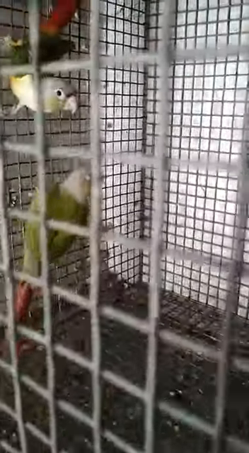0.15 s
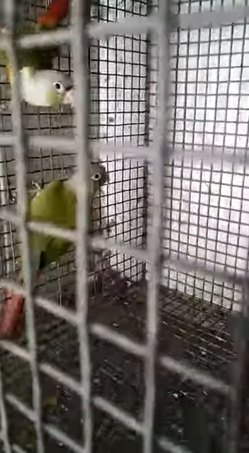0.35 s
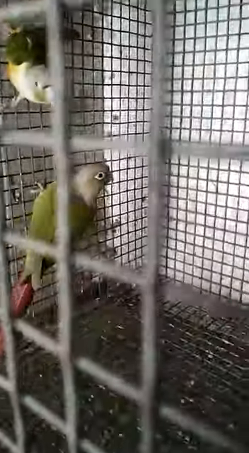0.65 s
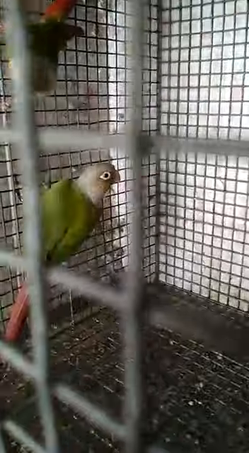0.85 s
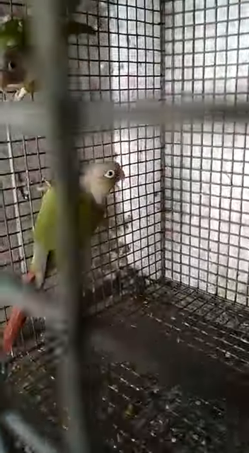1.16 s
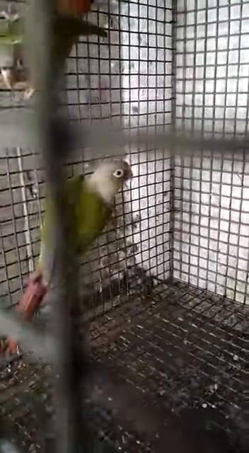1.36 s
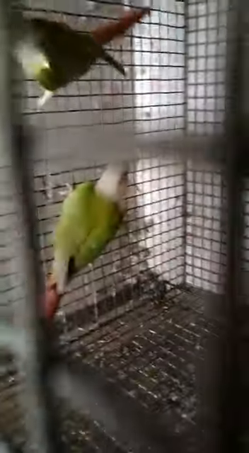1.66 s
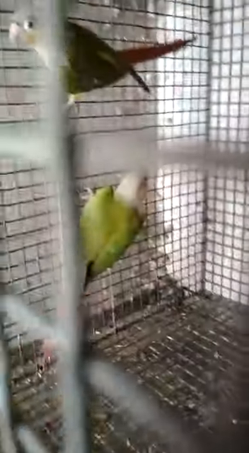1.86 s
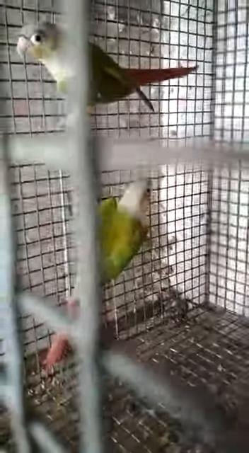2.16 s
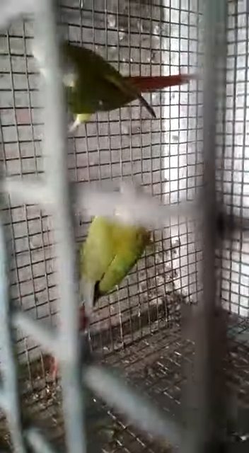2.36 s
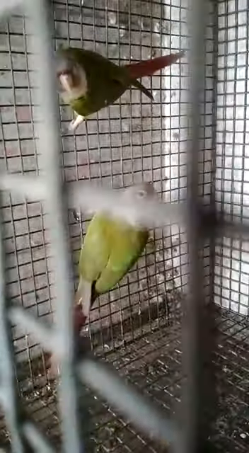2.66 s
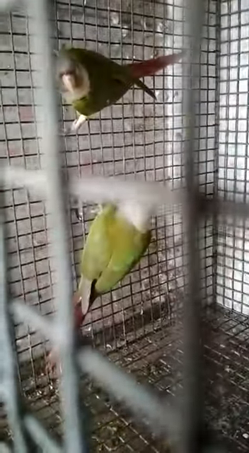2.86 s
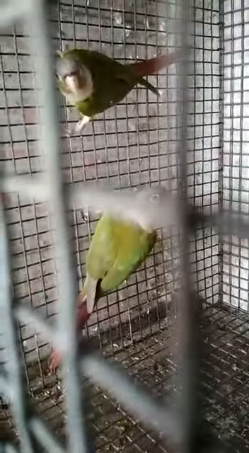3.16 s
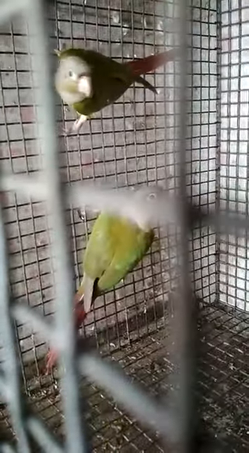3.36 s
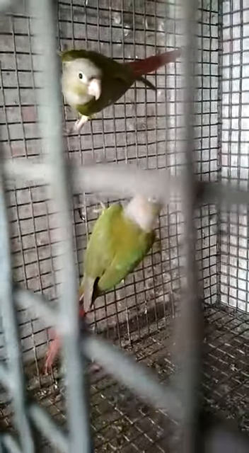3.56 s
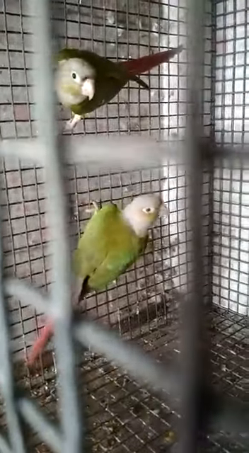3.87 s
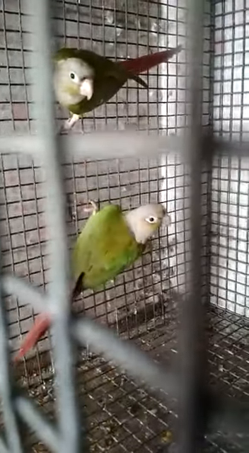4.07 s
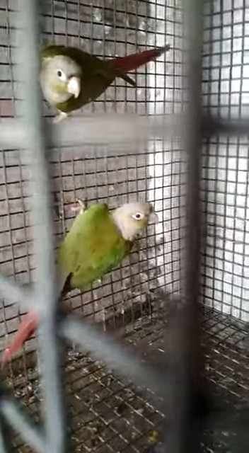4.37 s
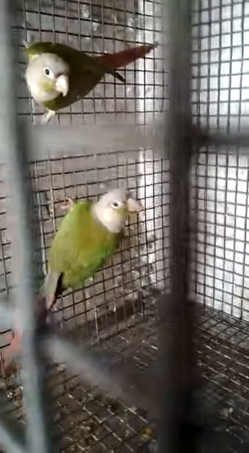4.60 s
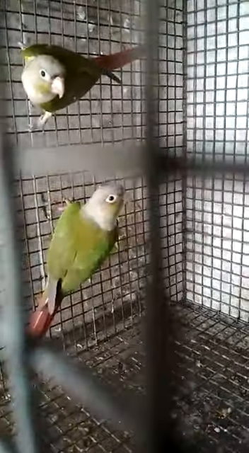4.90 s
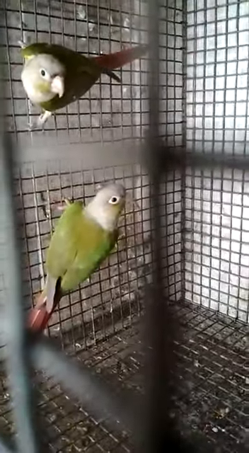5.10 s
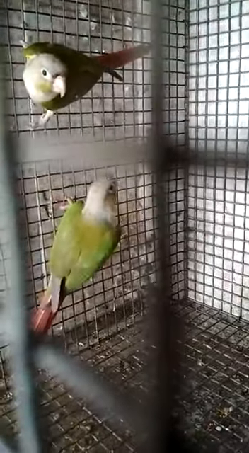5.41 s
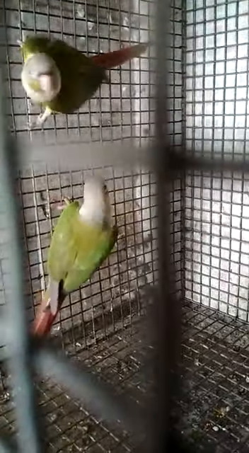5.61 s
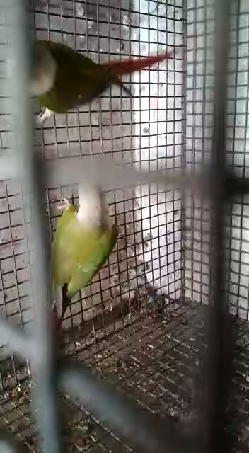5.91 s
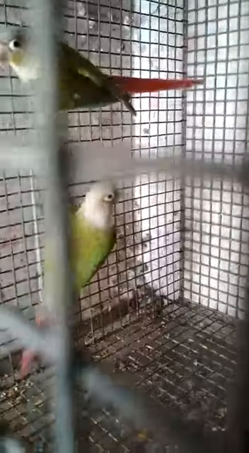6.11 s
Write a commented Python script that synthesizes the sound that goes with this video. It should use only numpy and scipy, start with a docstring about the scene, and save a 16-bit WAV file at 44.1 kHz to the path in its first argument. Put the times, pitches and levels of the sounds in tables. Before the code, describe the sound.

Loud, raspy, high-pitched parrot squawks close by give way to faint bird calls across a room, then a harsh bark and one more squawk.

```python
"""A small parrot squawks about four times a second in a wire cage, close to a phone, in a hard-walled
room; each squawk climbs by short notes to a rasping arch. Its nearer mate cuts in; the loudest notes
overload the microphone and make the gain control duck, with a low thump near 2 s. Other birds answer
from afar, and a hand shifts on the phone. Near the end come one lower bark and a last squawk.
A motor hums throughout."""
import sys
import numpy as np
from scipy import signal
from scipy.fft import rfft, irfft, next_fast_len
from scipy.io import wavfile
from scipy.ndimage import uniform_filter1d, map_coordinates

SR = 44100
rng = np.random.default_rng(int(sys.argv[2]) if len(sys.argv) > 2 else 0)


def dump(signal):
    """Clip the signal to [-1, 1] and save it as 16-bit WAV at the path in sys.argv[1]."""
    limited = np.clip(np.atleast_2d(signal).T, -1, 1)
    pcm = np.round(limited * 32767).astype(np.int16)
    wavfile.write(sys.argv[1], SR, pcm)


N = 275625
TOP_HZ = 15650

# Squawks of the leading parrot and its mate: (time [s], first note [s], second note [s], arch [s],
# second note's pitch [Hz], mid-arch pitch [Hz], relative level [dB])
LEADER_SQUAWKS = [ (-.055, 0.022, 0.014, 0.045, 2520, 2962, -5), (.2, .019, 0.022, 0.045, 2537, 3027, -5.5),
                  (.454, 0.0082, 0.022, 0.054, 2537, 3018, -6),
                  (.713, 0.0012, 0.018, 0.061, 2482, 2995, -5), (.99, .014, 0.015, .056, 2770, 2922, -6),
                  (1.253, 0.0021, .016, .056, 2510, 3024, -5.5),
                  (1.516, 0.012, 0.015, 0.054, 2580, 2938, -4),
                  (6.148, .013, 0.022, .046, 2502, 3018, -5.5)]
MATE_SQUAWKS = [ (.862, .016, 0.017, 0.04, 2594, 3057, 2.3), (1.081, .016, .015, 0.039, 2686, 3032, 2.3),
                (1.652, .015, 0.014, .033, 2740, 2884, 2), (2.031, 0.01, 0.018, .041, 2438, 3014, 5.2)]
# The three notes of a squawk: (relative level [dB], roughness [1])
LEADER_NOTES = [(-5.5, 0.73), (2, 0.53), (2, 0.53)]
MATE_NOTES = [(-6.5, 0.53), (-5, 0.52), (1, 0.38)]
# Resonances of throat and open beak: (frequency [Hz], gain [dB])
LEADER_THROAT = [(900, -16), (1700, -12.5), (2300, -4.5), (3000, -5), (3600, 3.5), (4600, 6), (5900, 1.5),
                 (6700, 0.5), (7600, -0.5), (8800, -6.5), (11300, 2.5), (12200, -4.5), (13200, -13),
                 (16000, -16)]
MATE_THROAT = [(900, -12), (1700, -7.5), (2300, -5.5), (3000, -8.5), (3600, 9), (4600, 6), (5900, 0.5),
               (6700, 4.5), (7600, 0.5), (8800, -5.5), (11300, 2.5), (12200, -0.5), (13200, -12),
               (16000, -10)]
def parrot(squawks, manner, throat):
    """Frequency modulation: the voice climbs through up to two short notes, then arches and falls."""
    climb, arch = (.96, 1.015), (.94, .82)
    gap_s = .00498  # the voice breaks between notes
    notes = []
    for s, first_s, second_s, arch_s, second_hz, arch_hz, db in squawks:
        steps = [(first_s, .875 * second_hz, climb), (second_s, second_hz, climb),
                 (arch_s, arch_hz, arch)]
        for (length, hz, bend), (note_db, rough) in zip(steps, manner):
            if length > gap_s:
                notes.append(note(s, length - gap_s, hz, db + note_db, bend, rough))
            s += length
    return syrinx(notes, throat, jitter=.065, flutter_rate=1500, rasp=6, hiss=1.65, doubling=.5,
                  edge=.002)


# The bark's catch, body and sagging end: (time [s], length [s], start pitch [Hz], middle pitch [Hz],
# end pitch [Hz], relative level [dB], roughness [1])
BARK_NOTES = [(5.723, 0.0046, 2070, 2090, 2120, -19, 0.9), (5.733, .066, 2250, 2307, 2193, -6, .62),
              (5.801, .019, 2135, 2110, 1990, -9.5, 0.3)]
# Its throat resonances: (frequency [Hz], gain [dB])
BARK_THROAT = [(900, -21.5), (1600, -19), (2200, -7), (3100, -3), (4300, -4.5), (5300, -2.5), (6200, -3),
               (7600, -10.5), (10000, -4), (12000, -17.5), (13200, -22), (16000, -15)]
def bark():
    """Aperiodic vibration: strong pitch jitter makes this lower call harsh."""
    return syrinx(BARK_NOTES, BARK_THROAT, jitter=.11, flutter_rate=1400, rasp=6, hiss=1.1,
                  doubling=.15, edge=.0027)


def note(s, length, hz, db, bend, rough):
    """A pitch glide through hz; bend holds the start and end pitch as ratios to it."""
    return s, length, hz * bend[0], hz, hz * bend[1], db, rough


def syrinx(notes, throat, jitter, flutter_rate, rasp, hiss, doubling, edge):
    """Source and filter: membranes flutter in pitch (jitter) and level (rasp); the throat resonates."""
    track = np.zeros(N)
    for s, length, start_hz, middle_hz, end_hz, db, rough in notes:
        size = int((length + edge) * SR)
        u = np.linspace(0, 1, size)
        arch = np.polyval(np.polyfit([0, .5, 1], [start_hz, middle_hz, end_hz], 2), u)
        pitch = arch * (1 + jitter * rough * wobble(flutter_rate, size))
        phase = 2 * np.pi * np.cumsum(pitch) / SR
        orders = np.arange(1, int(TOP_HZ / middle_hz) + 1)
        offsets = rng.uniform(0, 2 * np.pi, (16, 1))[:len(orders)]
        tone = unit(np.sin(orders[:, None] * phase + offsets).sum(0))
        tone *= 1 + doubling * rough * np.sin(phase / 2)  # period doubling: lines between harmonics
        breath = hiss * rough ** 2 * rng.standard_normal(SR // 2)[:size]
        source = (tone + breath) * amp(rasp * rough * wobble(flutter_rate / 2, size))
        gate = np.clip(np.minimum(u, 1 - u) * (length + edge) / edge, 0, 1)  # fades of edge seconds
        add(track, s, amp(db) * unit(shaped(source * gate, throat)))
    return track


# Balance between the microphone ports: (frequency [Hz], left minus right level [dB])
PORT_BALANCE = [(60, -3), (110, 12), (200, 10), (380, -2), (700, 7), (1290, 6.5), (2380, 4.5), (5600, 3),
                (8120, -2.5), (11000, -10), (15000, 0)]
def near_parrots():
    """Direct-to-reverberant ratio: of the birds close by, the nearer mate is drier than the leader."""
    leader = parrot(LEADER_SQUAWKS, LEADER_NOTES, LEADER_THROAT)
    mate = parrot(MATE_SQUAWKS, MATE_NOTES, MATE_THROAT)
    low_call = bark()
    heard = (room(leader, wet_db=0, walls_db=13.5, delays_s=(.0004, .007))
             + room(mate, wet_db=-6, walls_db=10, delays_s=(.0004, .009))
             + room(low_call, wet_db=-11, walls_db=19, delays_s=(.0004, .007)))
    return filtered(heard, lambda hz: amp(np.outer([.5, -.5], along(PORT_BALANCE, hz))))


# The flock's squawks and nasal chatter: (time [s], length [s], pitch [Hz], relative level [dB])
FLOCK_SQUAWKS = [ (1.821, .11, 2916, -31), (1.978, 0.046, 2690, -29), (2.203, 0.0497, 2984, -25),
                 (2.42, .10, 2770, -31.5), (2.535, 0.059, 3190, -35), (2.695, 0.025, 2800, -36),
                 (3.136, 0.055, 2820, -35), (3.32, 0.2, 2910, -33.5), (3.681, .13, 2943, -33),
                 (4.69, 0.09, 2860, -37), (4.789, .088, 2820, -37.5), (4.945, 0.063, 2876, -35),
                 (5.09, 0.084, 2990, -34.5), (5.347, 0.082, 2940, -33.5)]
FLOCK_CHATTER = [ (2.309, 0.089, 1140, -30), (2.891, 0.076, 1419, -33), (3.60, 0.087, 1131, -33),
                 (4.005, 0.024, 3520, -42.5), (4.179, 0.077, 1577, -36.5), (4.25, 0.098, 1127, -38.5),
                 (4.331, 0.076, 1087, -35.5), (4.441, 0.156, 1048, -41), (4.60, 0.053, 1138, -34.5),
                 (5.19, 0.067, 1065, -34), (5.24, 0.078, 1163, -35)]
# A deeper parrot rasps, then honks: (time [s], length [s], start pitch [Hz], middle pitch [Hz],
# end pitch [Hz], relative level [dB], roughness [1])
DEEP_NOTES = [(3.06, 0.15, 1433, 1563, 1617, -32.5, 1.1), (3.15, 0.21, 1765, 2024, 1913, -30.5, 0.99),
              (3.31, 0.1, 1635, 1669, 1740, -27.5, 0.36)]
# Their throat resonances: (frequency [Hz], gain [dB])
FLOCK_THROAT = [(1200, -35), (2200, 0.5), (3100, 5), (3800, 0.5), (4600, 10.5), (5900, 2), (7200, 3),
                (9000, -3.5), (11300, 7), (13200, -13), (16000, -53)]
CHATTER_THROAT = [(1200, -17), (2200, -13.5), (3200, 3), (3800, -6), (4600, 3.5), (5700, -8.5), (6900, -5),
                  (8000, -18), (9300, -6.5), (11300, -3), (13200, -15), (16000, -36.5)]
DEEP_THROAT = [(900, -14), (1600, -0.5), (2400, 0.5), (3300, -0.5), (5000, -0.5), (7000, -10), (11000, -5),
               (15000, -31)]
def far_parrots():
    """Diffuse field: birds across the room arrive mostly by way of the walls."""
    squawks = [note(*call, bend=(.99, .94), rough=.7) for call in FLOCK_SQUAWKS]
    chats = [note(*call, bend=(.95, .99), rough=.64) for call in FLOCK_CHATTER]
    flock = syrinx(squawks, FLOCK_THROAT, jitter=.07, flutter_rate=600, rasp=5, hiss=2.2,
                   doubling=.7, edge=.02)
    chatter = syrinx(chats, CHATTER_THROAT, jitter=.065, flutter_rate=250, rasp=6, hiss=1.6,
                     doubling=.2, edge=.02)
    deep = syrinx(DEEP_NOTES, DEEP_THROAT, jitter=.07, flutter_rate=500, rasp=5, hiss=2.2,
                  doubling=.4, edge=.02)
    return room(flock + chatter + deep, wet_db=3.5, walls_db=-4, delays_s=(.0011, .018))


# Reverberation time: (frequency [Hz], time to fall 60 dB [s])
ROOM_T60 = [(300, 0.073), (2600, 0.38), (5500, 0.34), (11000, 0.27), (16000, 0.15)]
def room(voice, wet_db, walls_db, delays_s):
    """Convolution: direct sound, early echoes off the cage walls and an exponentially decaying tail."""
    hz, t, spectra = signal.stft(rng.standard_normal((2, SR // 2)), SR, nperseg=256)
    tail = signal.istft(spectra * amp(-60 * t / along(ROOM_T60, hz)[:, None]), SR, nperseg=256)[1]
    tail *= 1 - np.exp(-np.arange(tail.shape[1]) / SR / .0021)
    early = np.zeros_like(tail)
    for port in early:
        taps = (rng.uniform(*delays_s, size=14) * SR).astype(int)
        port[taps] += amp(walls_db) * unit(rng.standard_normal(len(taps))) / np.sqrt(len(taps))
    early[0, 8] += 1
    early[1, 0] += 1  # direct sound reaches the nearer, right port first
    response = early / np.linalg.norm(early[0]) + amp(wet_db) * tail / np.linalg.norm(tail[0])
    return signal.fftconvolve(voice[None], response, axes=1)[:, :N] / np.hypot(1, amp(wet_db))


# First a low thump under the loudest squawk, then shuffles of the hand on the phone:
# (time [s], length [s], thud level [dB], brushing level [dB])
THUMP_AND_SHUFFLES = [(2.064, 0.03, -10, -16), (2.601, 0.23, -30.5, -39.5), (2.774, 0.25, -31.5, -40),
                      (3, 0.11, -56, -35), (4.659, 0.083, -56, -38), (5.979, 0.23, -33, -41.5)]
def thump_and_shuffles():
    """Noise bursts: a low thump under the loudest squawk; later, structure-borne sound of the hand."""
    thud_spectrum = [(12, 0), (28, 31), (60, -11), (140, 2.5), (260, -9), (700, -6), (2000, -70)]
    brush_spectrum = [(1000, -1.5), (7000, -4), (11000, 2), (15000, -1.5)]
    track = np.zeros(N)
    for s, length, thud_db, brush_db in THUMP_AND_SHUFFLES:
        size = int(length * SR)
        noise = rng.standard_normal((2, SR // 2))[:, :size]
        thud = unit(shaped(noise[0], thud_spectrum))
        brush = unit(shaped(noise[1], brush_spectrum)) * amp(wobble(177, size))
        add(track, s, signal.windows.tukey(size, .5) * (amp(thud_db) * thud + amp(brush_db) * brush))
    return track


# Partials of the motor: (frequency [Hz], relative level [dB])
MOTOR_PARTIALS = [(91.5, -48.5), (140.0, -55.5), (274.5, -62), (398.4, -58), (457.6, -59), (737.5, -64),
                  (1109, -65)]
def motor_hum():
    """A line spectrum: each partial wanders in level and phase, so the hum is slightly unsteady."""
    t = np.arange(N) / SR
    return sum(amp(db + 4 * wobble(6.3)) * np.sin(2 * np.pi * hz * t + 1.02 * wobble(9.1))
               for hz, db in MOTOR_PARTIALS)


# Spectrum of the room's air: (frequency [Hz], relative spectral density [dB])
AIR_SPECTRUM = [(25, 4), (58, -18), (85, -6), (261, -12.5), (467, -13.5), (974, -17.5), (1420, -17),
                (2170, -20), (2480, -14.5), (3040, -19.5), (4150, -21.5), (6480, -31.5), (11600, -25),
                (12600, -25.5), (15400, -42)]
# Its likeness at the two ports: (frequency [Hz], correlation [1])
AIR_CORRELATION = [(60, 1), (180, 1), (550, 0.71), (1650, -0.0085), (4970, 0.25), (15000, -0.23)]
def room_air():
    """Partial coherence: a shared and an opposed noise mix to set how alike the two ports sound."""
    def response(hz):
        angle = np.arccos(np.clip(along(AIR_CORRELATION, hz), -1, 1)) / 2
        return amp(along(AIR_SPECTRUM, hz)) * [np.cos(angle), np.sin(angle)]
    mid, side = filtered(rng.standard_normal((2, N)), response)
    return amp(-38.5 + .077 * wobble(6.3)) * unit(np.array([mid + side, mid - side]))


def amp(db):
    """Decibels to gain."""
    return 10 ** (np.asarray(db) / 20)


def unit(x):
    """Normalisation to rms 1."""
    return x / np.sqrt(np.mean(x ** 2) + 1e-20)


def along(points, hz):
    """Interpolation of (frequency [Hz], value) points on a log axis."""
    knots, values = np.transpose(points)
    return np.interp(np.log(hz + 1), np.log(knots + 1), values)


def wobble(rate, size=N):
    """A smooth random curve, rate knots a second."""
    return map_coordinates(rng.standard_normal(4096), [np.arange(size) * rate / SR], mode="wrap")


def filtered(x, response):
    """Linear filtering: the spectrum times a frequency response."""
    size = x.shape[-1]
    padded = next_fast_len(size + 2048)
    return irfft(rfft(x, padded) * response(np.fft.rfftfreq(padded, 1 / SR)), padded)[..., :size]


def shaped(x, points):
    """Filtering by (frequency [Hz], gain [dB]) points."""
    return filtered(x, lambda hz: amp(along(points, hz)))


def add(track, s, sound):
    """Mix a sound into a track at time s."""
    start = round(s * SR)
    part = sound[max(-start, 0):N - start]
    track[max(start, 0):][:len(part)] += part


def scene():
    """Superposition of birds, thump, shuffles and a background that leans to the right."""
    birds = near_parrots() + far_parrots()
    background = (room_air() + amp(4.5) * motor_hum()) * amp([[-1.1], [1.1]])
    return birds + thump_and_shuffles() + background


def overload(x, upper, lower):
    """Asymmetric saturation: one side of the wave flattens sooner, so loud notes get a low crackle."""
    limit = np.where(x > 0, upper, lower)
    return x / (1 + np.abs(x / limit) ** 6) ** (1 / 6)


def gain_control(x, threshold_db, release_db_per_s, firmness):
    """Compression: the gain drops at once by a share (firmness) of the excess level, then recovers."""
    power = np.abs(uniform_filter1d(x ** 2, 180, axis=1)).max(0)
    excess_db = np.maximum(10 * np.log10(power + 1e-12) - threshold_db, 0)
    ramp = release_db_per_s * np.arange(N) / SR
    cut_db = np.maximum.accumulate(firmness * excess_db + ramp) - ramp
    return x * amp(-uniform_filter1d(cut_db, 90))


def record(dry):
    """A nonlinear chain: overload, bass roll-off, gain control, full-scale clipping and band limit."""
    saturated = overload(dry, upper=2.02, lower=5.53)
    mic = filtered(saturated, lambda hz: (1j * hz / (48 + 1j * hz)) ** 2)
    ducked = gain_control(mic, threshold_db=-8, release_db_per_s=56, firmness=.84)
    return filtered(np.clip(ducked, -1, 1), lambda hz: hz < TOP_HZ)


dry = scene()
out = record(dry)
dump(out)
```